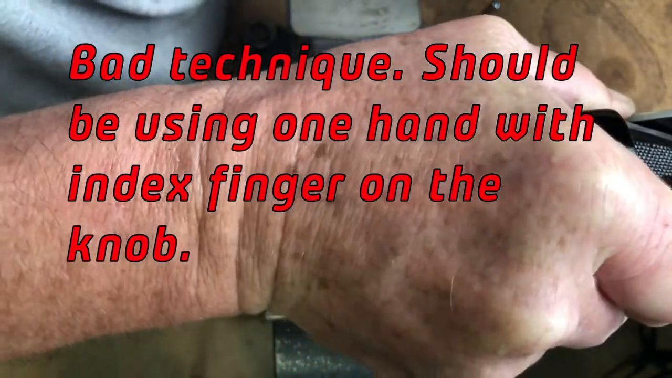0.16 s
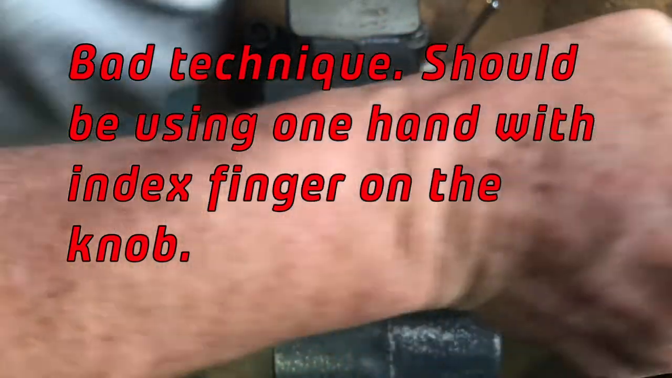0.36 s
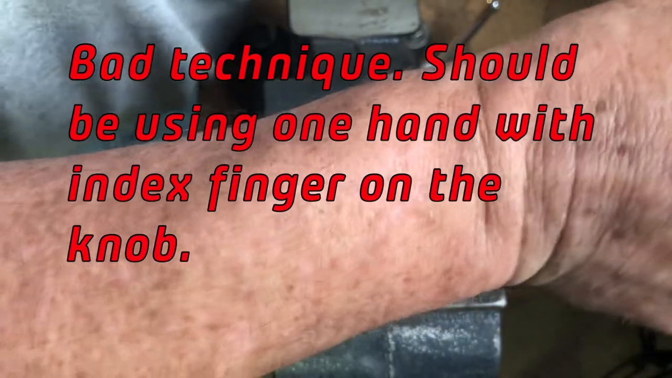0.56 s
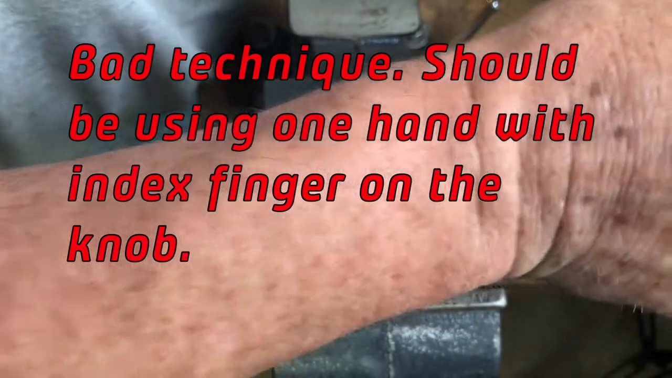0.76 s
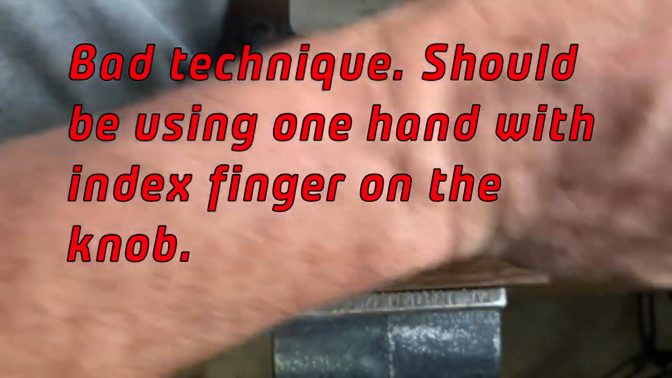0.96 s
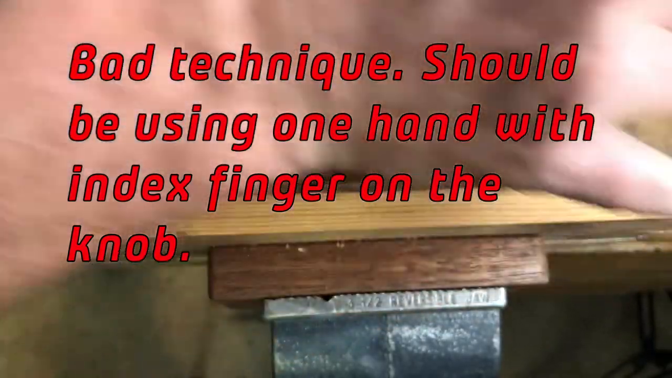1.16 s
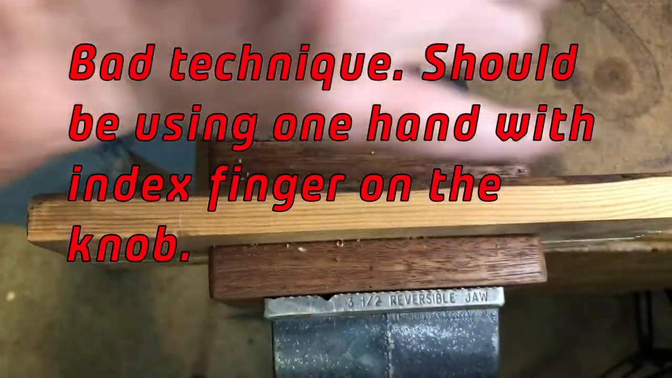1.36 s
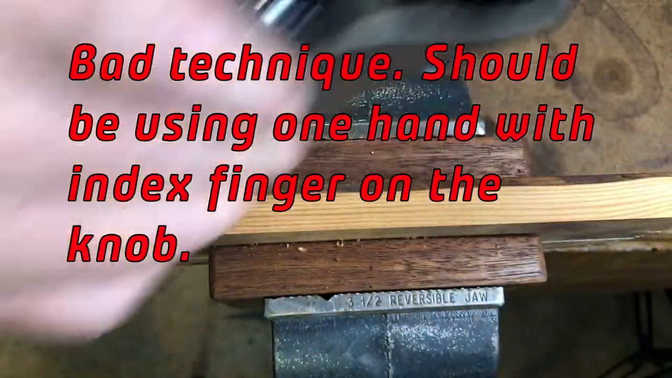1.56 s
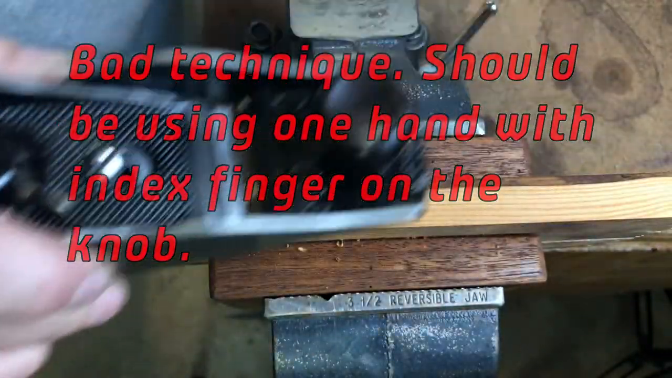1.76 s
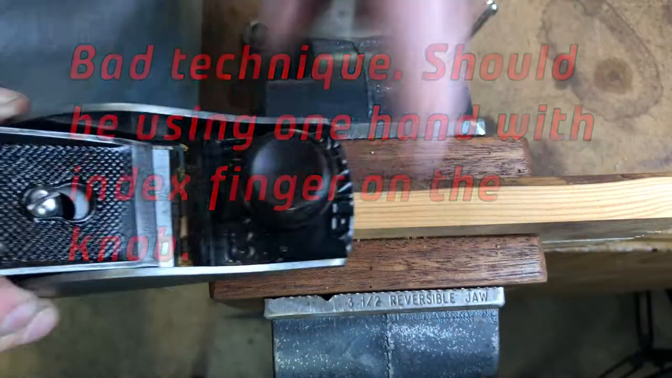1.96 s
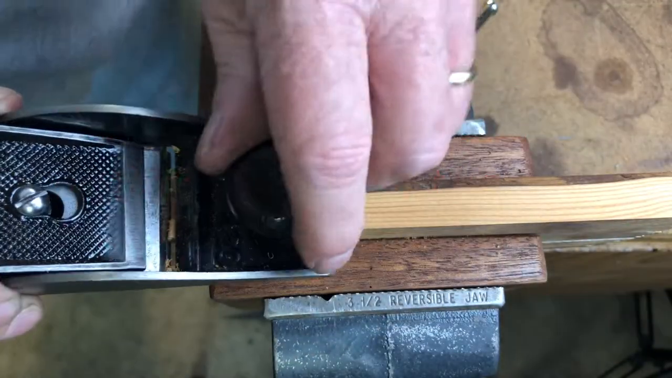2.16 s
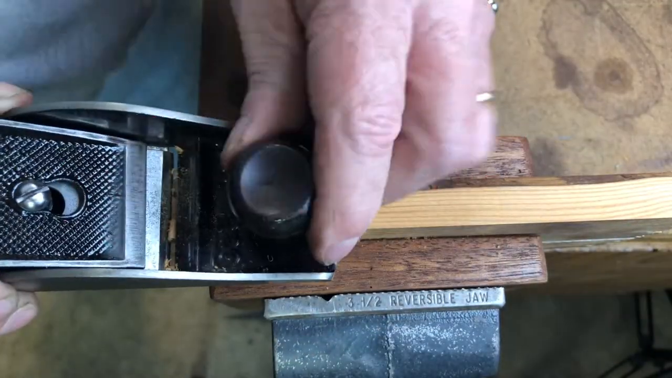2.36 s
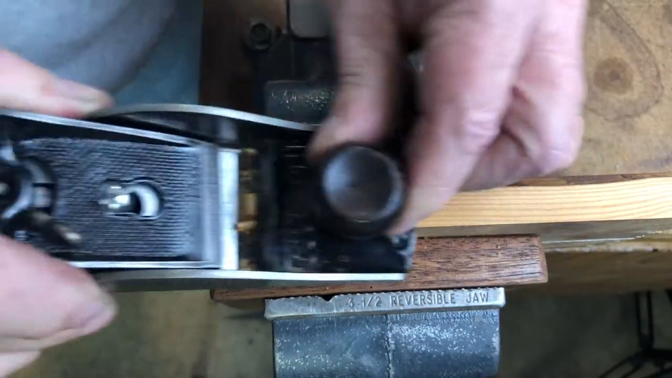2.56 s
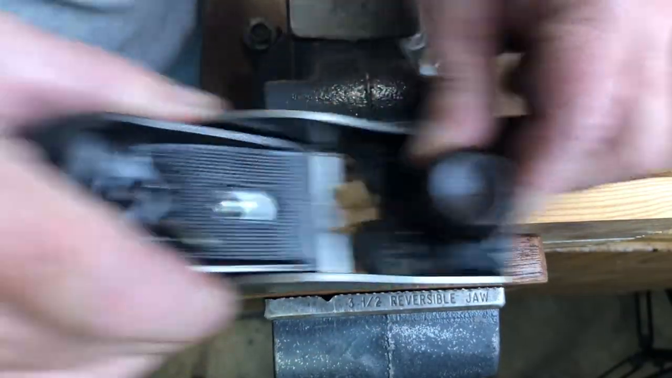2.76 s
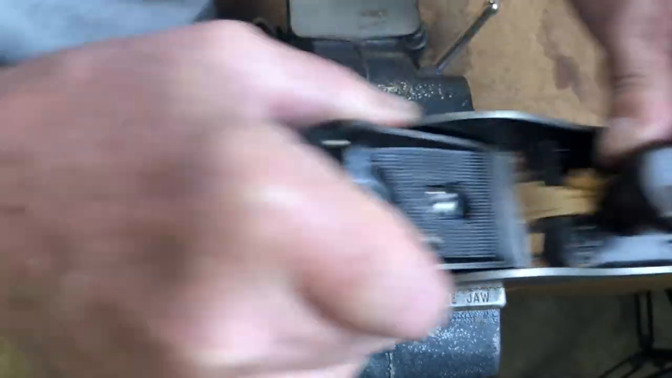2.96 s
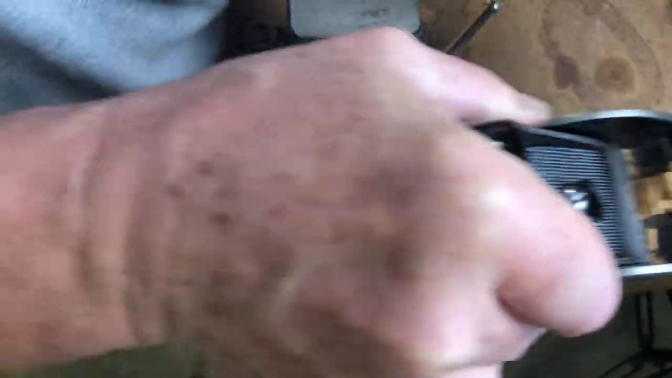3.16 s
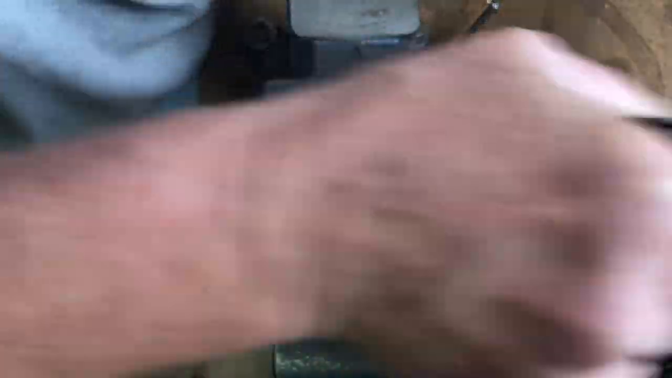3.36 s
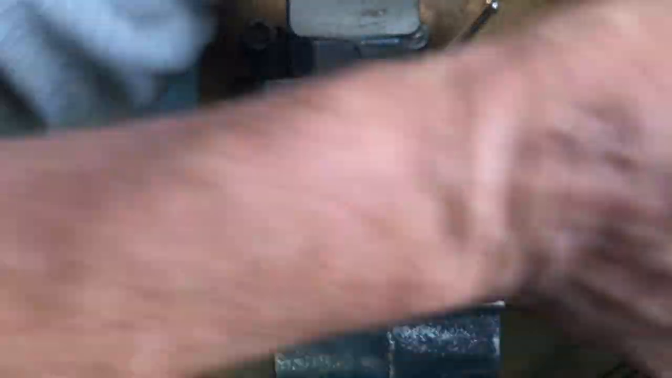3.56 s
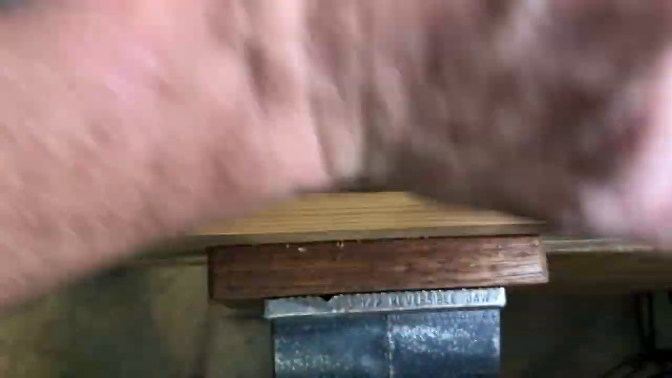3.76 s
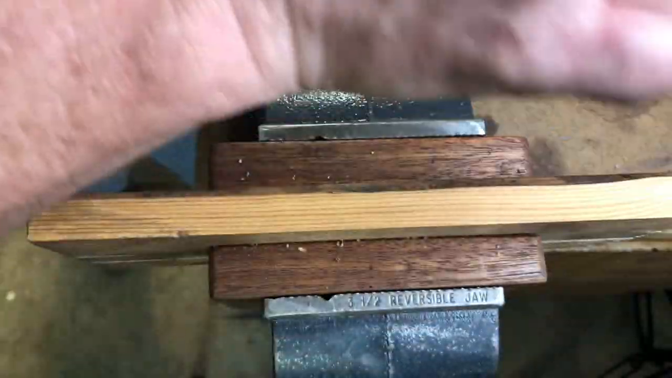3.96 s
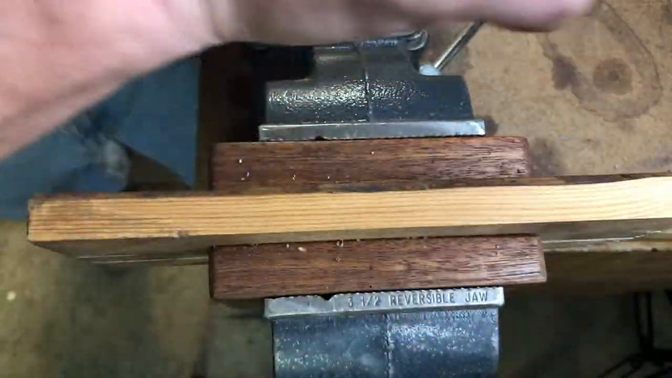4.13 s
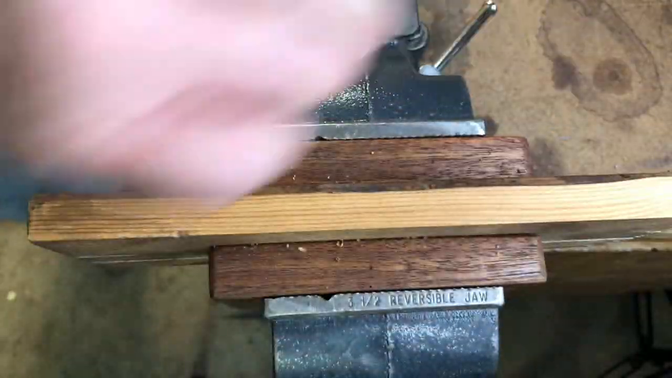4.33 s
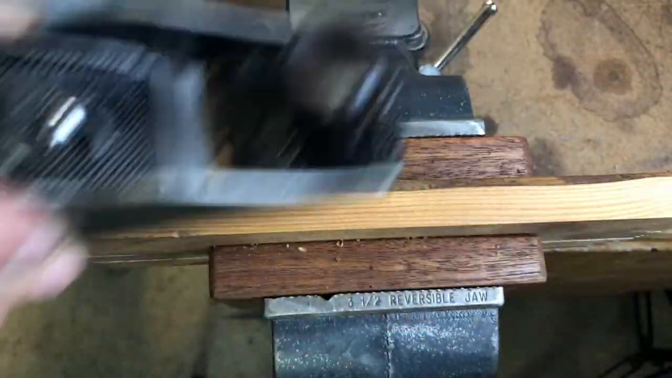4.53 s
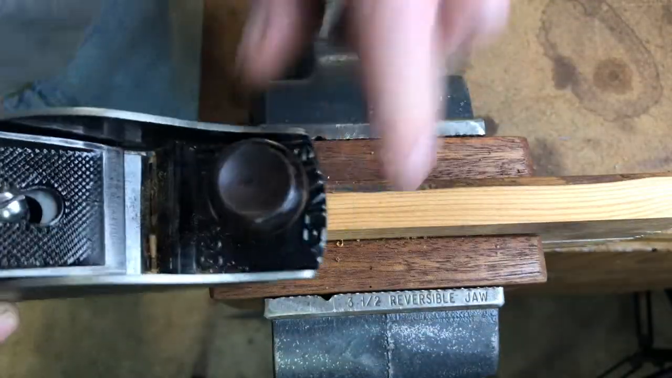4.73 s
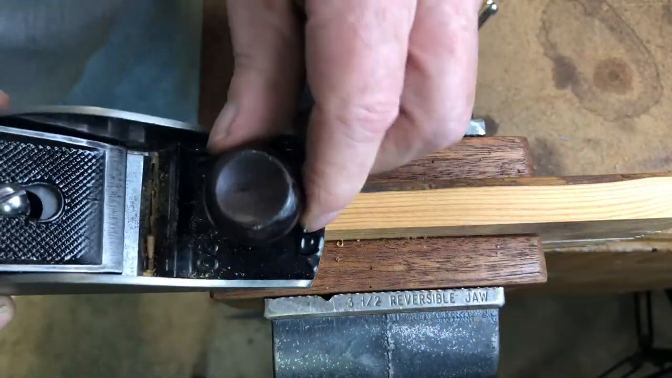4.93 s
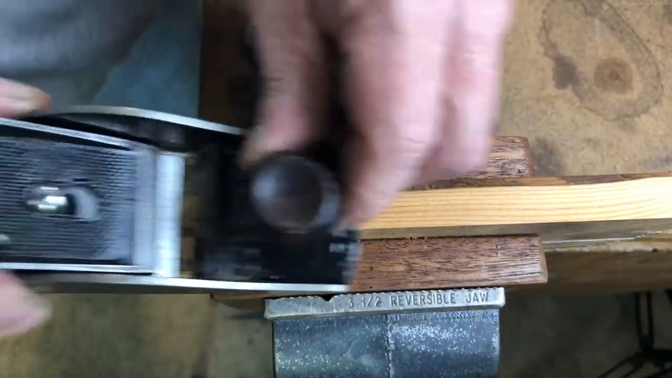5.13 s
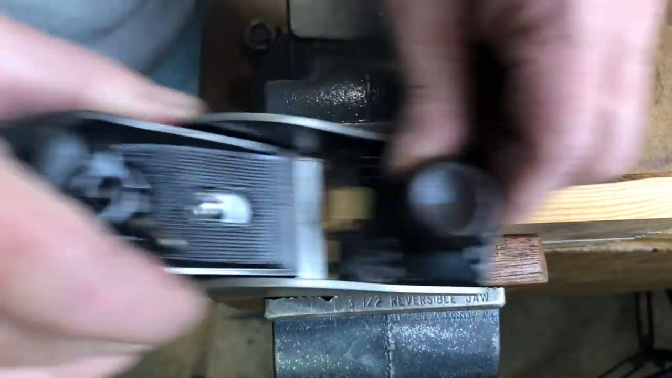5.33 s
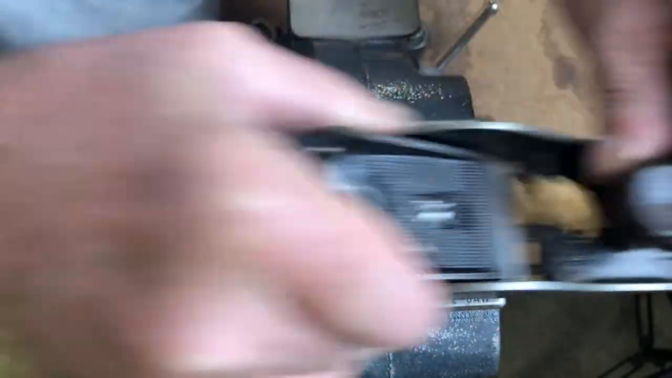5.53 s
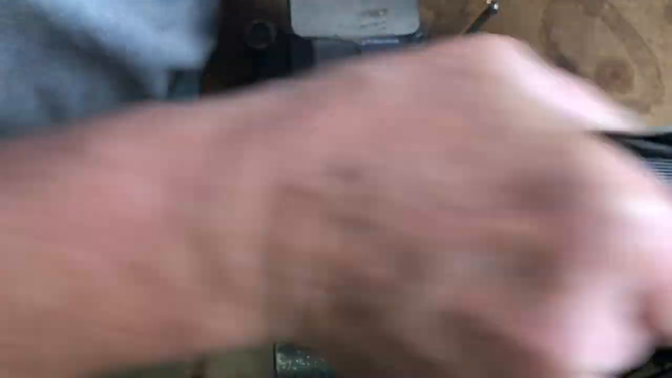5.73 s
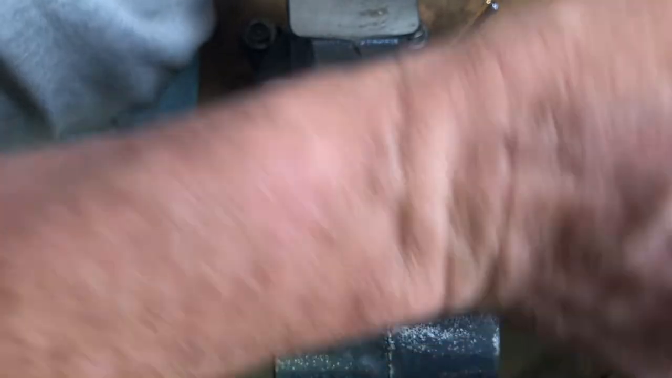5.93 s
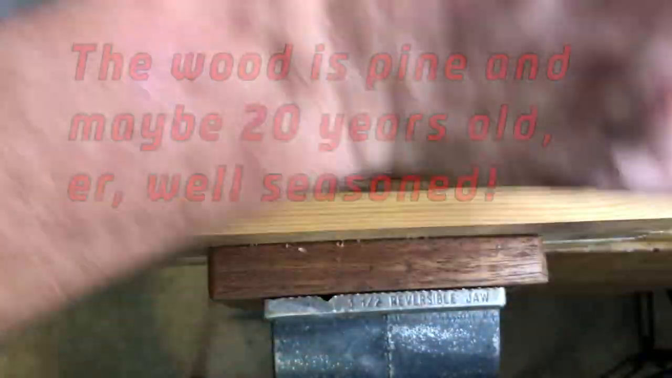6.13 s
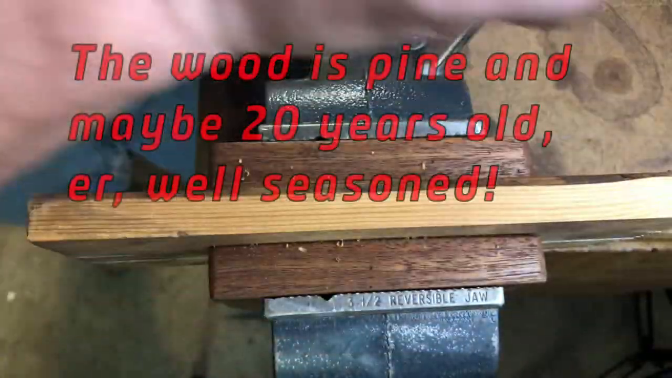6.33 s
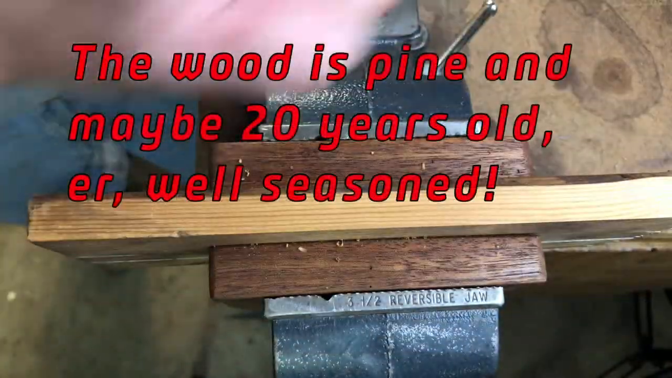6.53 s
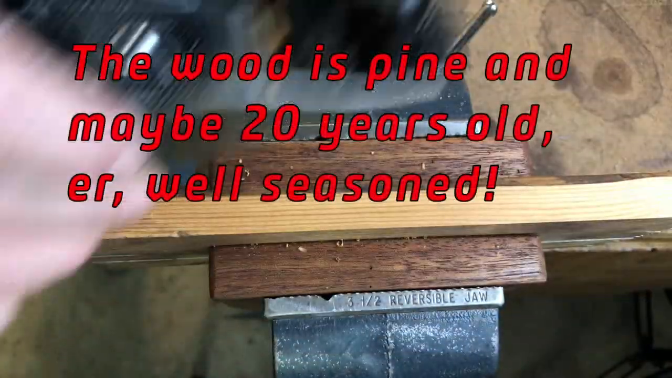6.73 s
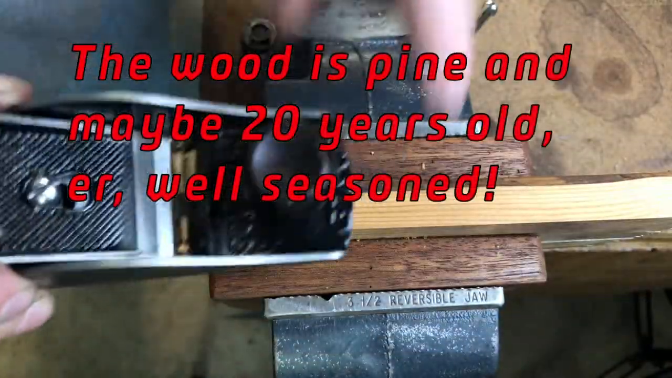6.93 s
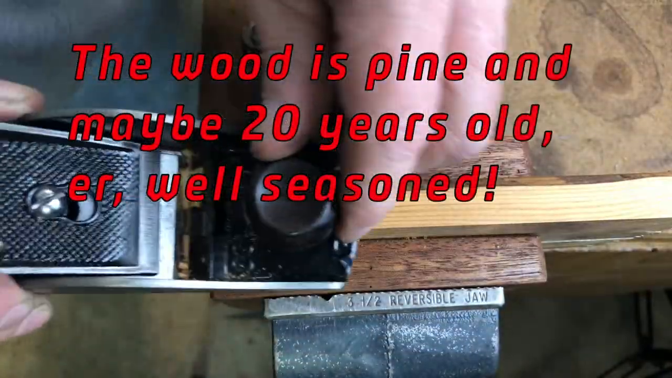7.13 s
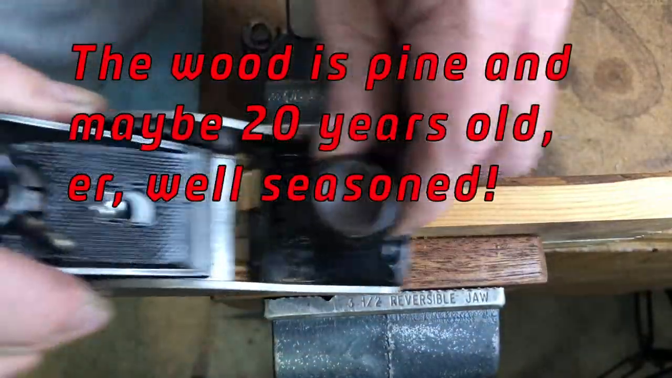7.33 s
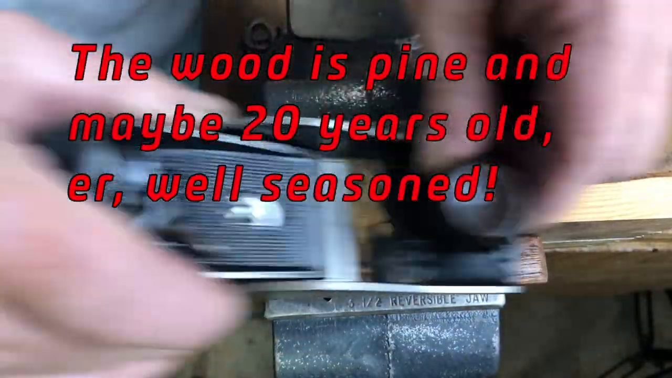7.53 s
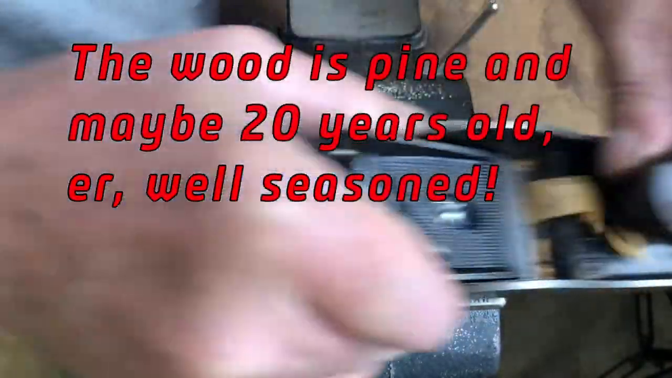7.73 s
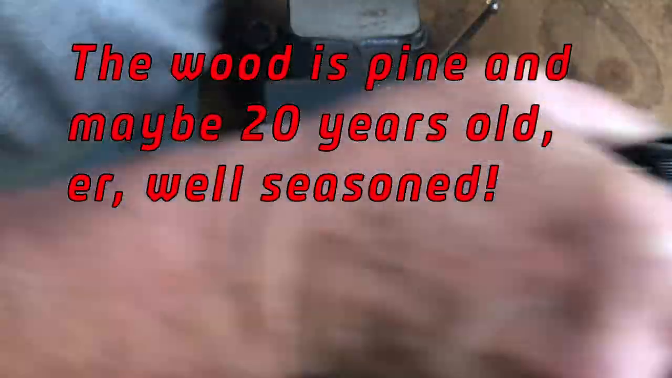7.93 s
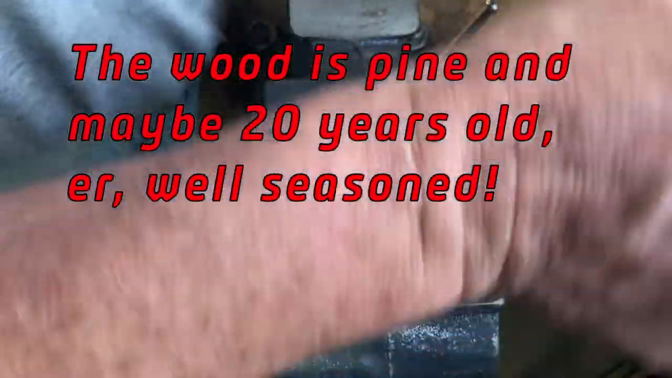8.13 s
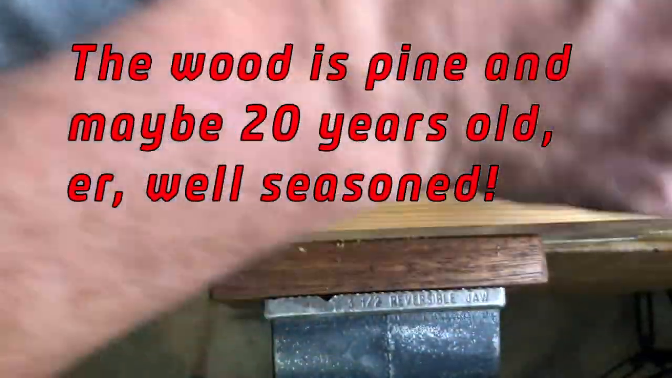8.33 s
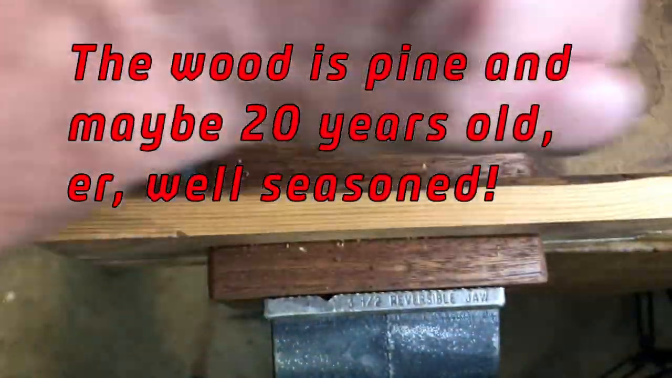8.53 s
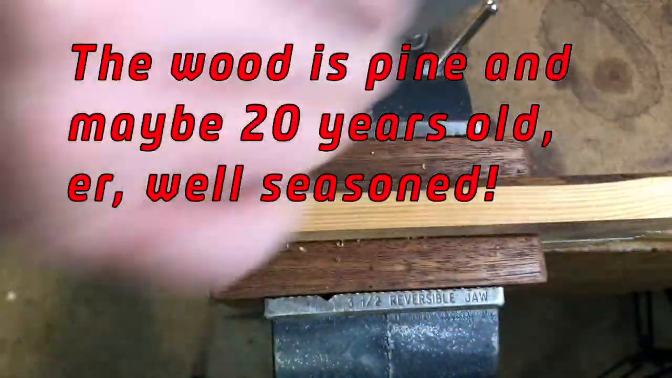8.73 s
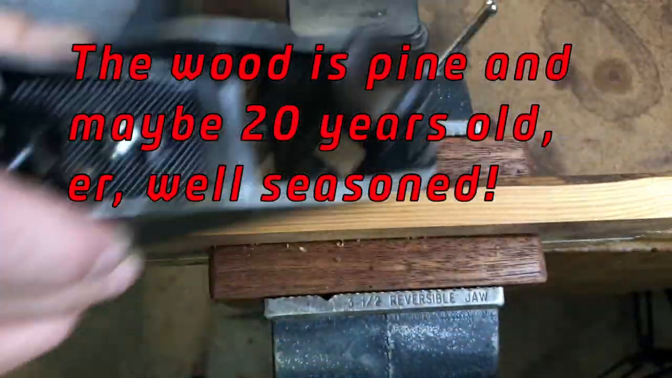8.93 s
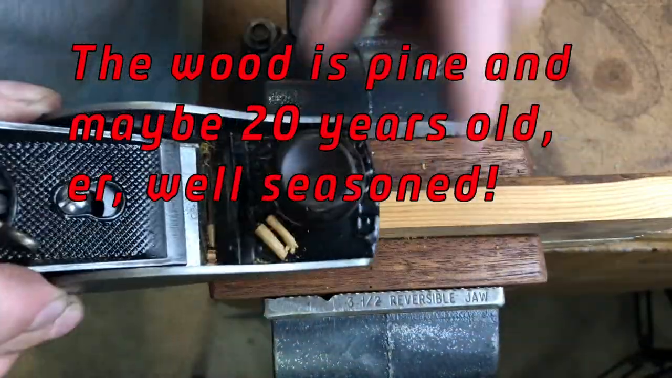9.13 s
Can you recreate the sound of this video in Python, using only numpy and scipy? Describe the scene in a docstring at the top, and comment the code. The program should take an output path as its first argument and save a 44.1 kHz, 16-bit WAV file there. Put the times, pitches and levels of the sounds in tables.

```python
"""A metal hand plane works the edge of a pine board held in a vice, heard close by in a small workshop.
First it is set down with a knock, a sum of decaying modes and filtered noise bursts, and makes short scrapes.
Then come longer strokes: friction noise from the sole, fractures that ring the iron, stick-slip chatter.
After each stroke, fingers pull the crisp shaving from the plane's mouth as a crackle of random grains.
Throughout, sleeves brush faintly over still air and a faint hum; a decaying echo follows the work."""
import sys
import numpy as np
from scipy import signal
from scipy.fft import rfft, irfft
from scipy.io import wavfile
from scipy.ndimage import uniform_filter1d, map_coordinates

SR = 44100
rng = np.random.default_rng(int(sys.argv[2]) if len(sys.argv) > 2 else 0)


def transcribe(signal):
    """Save signal, clipped to [-1, 1], as a 16-bit WAV file at the path in sys.argv[1]."""
    frames = np.atleast_2d(signal).T
    limited = np.clip(frames, -1, 1)
    pcm = np.round(limited * 32767).astype(np.int16)
    wavfile.write(sys.argv[1], SR, pcm)


N = 405279
T = np.arange(N) / SR

# Spectrum of the still air: (frequency [Hz], relative density [dB])
AIR_SPECTRUM = [(15, -43), (35, -1), (90, 1), (320, -2), (600, -9.5), (2300, -12.5), (3200, -15.5),
                (5400, -21.5), (16000, -28.5)]
# Tones of the hum: (frequency [Hz], rms level [dB])
HUM_TONES = [(118.4, -83.5), (1120, -89)]
# Echo of the workshop by octave-wide bands: (centre [Hz], decay by 60 dB [s], level [dB])
ROOM_BANDS = [(127, .5, -5), (232, .42, -9.5), (501, 0.23, -3.5), (1100, 0.26, -8.5), (1860, 0.37, -13.5),
              (4080, 0.48, -14), (8010, 0.13, -15), (14000, .16, -22.5)]

# Fingers pull a shaving out or shift on the plane: (loudest at [s], rise [s], fall [s], level [dB])
SHAVING_PULLS = [(1.18, 0.16, 0.22, -57), (1.534, 0.032, 0.047, -57), (2.26, 0.34, 0.27, -72),
                 (4.08, 0.13, 0.22, -55.5), (6.308, 0.045, 0.11, -51.5), (6.39, 0.071, 0.11, -53),
                 (6.58, 0.037, 0.052, -53.5), (8.535, 0.22, 0.17, -48.5), (8.748, 0.018, 0.066, -57)]
# Splinters snap at the edge and dry shavings crack: (time [s], level before a common cut [dB])
FIBRE_SNAPS = [(0.155, -35), (0.1768, -33.5), (0.2036, -30), (1.1784, -56), (1.514, -47), (1.64, -46.5),
               (1.785, -50.5), (2.9793, -26.5), (3.027, -29), (3.171, -35), (3.1975, -32.5), (3.254, -26),
               (4.0755, -42), (4.3141, -47.5), (4.4636, -44.5), (5.4616, -24), (6.308, -39), (6.359, -40),
               (6.5194, -49), (6.7313, -44.5), (7.708, -32), (8.533, -38), (8.6787, -54), (8.888, -44)]
# Spectra of crinkling shavings and of a snap: (frequency [Hz], relative density [dB])
SHAVING_SPECTRUM = [(300, -9), (750, -14.5), (1400, -7), (2700, -7.5), (4300, -1.5), (6000, -3),
                    (8000, -1.5), (11000, -0.5), (15500, -2)]
SNAP_SPECTRUM = [(800, -31), (2500, -14.5), (4500, -33), (8000, -1.5), (11000, -3.5), (15500, 0.5)]
# Resonances of a curled shaving: (frequency [Hz], width [Hz], gain [dB])
CURL_RESONANCES = [(2200, 250, -2), (3840, 200, 2), (4380, 240, -4.5), (5800, 660, -2.5)]

# The plane is set down, lurches or drops off the end:
# (time [s], peak level [dB], low-pass edge set by contact hardness [Hz], vice thud against the blow [dB])
PLANE_KNOCKS = [(0.021, -56, 504, 3), (0.161, -41, 390, 13), (.195, -43, 477, -16), (0.334, -36, 930, 0),
                (1.932, -37.5, 1380, -14), (3.48, -40, 687, 0.5), (4.7309, -24.5, 5400, -17.5),
                (5.027, -52, 300, 8), (5.744, -37, 595, 2), (6.9256, -29.5, 4760, -11),
                (9.044, -23, 5470, -16)]
# Light taps of the plane's loose parts: (time [s], level before a common cut [dB])
METAL_TAPS = [(.157, -40), (.2045, -39), (0.7866, -51), (0.864, -48.5), (3.336, -34.5), (6.152, -55)]
# Struck modes of plane on board and of board in vice: (frequency [Hz], level [dB], decay by 60 dB [s])
BODY_MODES = [(781, -1, 0.034), (961, 1, 0.06), (1142, -2.5, 0.069), (1530, -5, 0.039), (1710, -0.5, 0.05),
              (1893, -17, 0.032), (2250, -1, 0.018), (2563, 6, 0.016), (3960, -26, 0.02),
              (6200, -21, 0.027)]
VICE_MODES = [(81, -8, 0.46), (124, -13, 0.33), (172, -8, 0.062), (202.8, 0.5, 0.21), (329, -3.5, 0.21),
              (418.6, -10, 0.15), (487, -1.5, 0.33), (605, 4, 0.09)]
# Spectrum of the crack of a knock: (frequency [Hz], relative density [dB])
CRACK_SPECTRUM = [(100, -41), (430, -1.5), (600, -9.5), (850, -7), (1130, -2.5), (1650, -2.5), (2600, -11),
                  (3000, -18.5), (3860, -8), (4800, -24), (6150, -14.5), (8600, -20.5), (16000, -22)]

# The edge catches with a hollow rasp: (start [s], end [s], first pitch [Hz], last pitch [Hz], level [dB])
EDGE_RASPS = [(2.479, 2.523, 611, 556, -42.5), (2.652, 2.699, 484, 524, -43.5),
              (2.725, 2.783, 1500, 1880, -43.5), (2.812, 2.821, 955, 805, -48.5),
              (5.246, 5.38, 1130, 846, -42), (7.462, 7.494, 593, 782, -43), (7.52, 7.584, 1496, 1905, -40)]
# The edge sticks and slips: (full from [s], until [s], rise [s], fall [s], pitch at full [Hz],
# level [dB], irregular amplitude share [0-1])
EDGE_CHATTER = [(.548, 0.56, .04, 0.058, 496, -54, 0.5), (2.825, 3.0, 0.016, 0.24, 442.7, -43, 0.79),
                (3.11, 3.279, .22, .14, 345, -35, 0.84), (5.44, 5.64, .15, 0.29, 426.3, -50, 0.4),
                (7.641, 7.695, 0.094, 0.11, 418.6, -30.5, 0.17),
                (7.75, 7.773, 0.097, 0.033, 400.3, -37.5, 0.5)]

# The sole slides: (up to speed [s], slows [s], rise [s], fall [s], rubbing level as it slows [dB])
SOLE_SLIDES = [(0.015, 0.028, 0.034, 0.033, -61), (0.185, 0.198, 0.035, 0.05, -50.5),
               (0.233, 0.263, 0.015, 0.58, -62), (0.527, 0.541, 0.75, 0.029, -66.5),
               (0.869, .87, 0.15, 0.035, -66.5), (2.445, 2.517, 0.079, .12, -49),
               (2.648, 3.299, 0.053, 0.21, -47.5), (5.105, 5.736, 0.16, 0.058, -45),
               (7.322, 7.896, 0.31, 0.038, -46), (7.936, 8.03, 0.022, 0.062, -67)]
# The iron takes a shaving: (start [s], end [s], tearing level at end [dB], ringing level at end [dB])
IRON_CUTS = [(0.177, 0.206, -59, -45), (0.505, 0.533, -81, -55), (0.887, 0.873, -84, -63.5),
             (2.675, 3.099, -44.5, -37), (3.217, 3.307, -48, -33.5), (5.292, 5.724, -39.5, -30),
             (7.515, 7.9, -41, -34), (7.978, 8.027, -62, -56)]
# The board shudders in the vice: (full from [s], until [s], rise [s], fall [s], level [dB])
BOARD_SHUDDERS = [(0.014, 0.025, .03, 0.069, -52.5), (0.167, .2, 0.026, 0.034, -45),
                  (2.397, 2.702, 0.046, 0.2, -54), (2.548, 2.554, 0.033, .05, -46.5),
                  (3, 3.036, 0.22, 0.073, -46), (3.16, 3.342, 0.075, 0.1, -45),
                  (5.031, 5.1, 0.019, 0.18, -50.5), (7.218, 7.266, 0.17, .1, -53)]
# Resonances of board, iron and plane's mouth, each before later shaping:
# (frequency [Hz], width [Hz], gain [dB])
BOARD_RESONANCES = [(320, 30, -1), (496.7, 34, 2), (611, 62, 2.5), (945, 61, -3.5), (1084, 92, 0),
                    (1465, 140, -6), (1894, 15, 0.5), (2100, 51, -12), (2980, 31, -5)]
IRON_RESONANCES = [(1227, 58, 0.5), (1293, 62, -3), (1378, 56, 6), (1490, 50, -10.5), (2260, 46, -8.5),
                   (2512, 98, 3), (2645, 80, 0)]
MOUTH_RESONANCES = [(3590, 100, -2.5), (3980, 45, 0.5), (4270, 63, -3.5), (5050, 160, -3.5),
                    (6250, 140, 4.5), (7490, 130, -0.5), (9360, 180, -8.5), (10300, 180, -8.5)]
# Spectra of rubbing, tearing and bench rumble: (frequency [Hz], relative density [dB])
RUB_SPECTRUM = [(120, -52.5), (200, -16.5), (300, -9.5), (500, -7), (900, -9), (1740, -11), (2300, -12),
                (3000, -41.5), (8000, -31), (16000, -47)]
TEAR_SPECTRUM = [(800, -19), (1700, -5), (2200, 15.5), (2650, 15.5), (2900, 4), (3400, 3), (5000, 0.5),
                 (7500, -1.5), (8500, -1.5), (12000, -1), (15500, -2)]
RUMBLE_SPECTRUM = [(25, -46.5), (50, -11.5), (80, -8.5), (170, 4.5), (260, 0.5), (330, 0.5), (500, -10.5),
                   (1200, -56.5)]

AIR_DB = -71.5
SLEEVE_DB, SLEEVE_SWAY_DB = -89, 3.5  # sleeves brush faintly all the while
SAG_HZ_PER_S = 310  # the chatter sinks as the plane travels
RASP_EDGE_S = .06  # rise and fall of a rasp
RASP_SPREAD_HZ, SLIP_SPREAD_HZ = 194, 59.4  # scatter of the rasp and irregular slips about their pitch
LEAN_DB_PER_S = 11  # the hand leans harder as a slide goes on
# Hiss, ring of the iron and bench rumble that mere sliding makes, against the rub
SCUFF_DB, SHIVER_DB, DRAG_DB = -4.5, -7.5, -8.5
BITE_S, BREAK_S = 0.042, 0.031  # the iron sinks in; the shaving breaks off
TEAR_DB_PER_S, RING_DB_PER_S = 10.5, 41  # a growing shaving tears louder and rings the iron harder
TOP_HZ = 16200


def amp(db):
    """Logarithmic level: decibels converted to an amplitude gain."""
    return 10 ** (np.asarray(db) / 20)


def colour(x, points):
    """Minimum-phase filtering: a folded cepstrum gives the (Hz, dB) response a causal impulse."""
    hz, db = np.transpose(points)
    size = 4096
    grid = np.maximum(np.fft.rfftfreq(size, 1 / SR), 1)
    log_gain = np.log(amp(np.interp(np.log(grid), np.log(hz), db)))
    cepstrum = irfft(log_gain)
    cepstrum[1:size // 2] *= 2
    cepstrum[size // 2 + 1:] = 0
    impulse = irfft(np.exp(rfft(cepstrum)))
    return signal.fftconvolve(x, impulse)[:len(x)]


def band(x, lo, hi):
    """Band-pass filtering: only energy between two edges in Hz passes."""
    edges = [lo, min(hi, SR / 2 - 100)]
    return signal.sosfilt(signal.butter(N=3, Wn=edges, btype="band", fs=SR, output="sos"), x)


def lowpass(x, hz):
    """Second-order low-pass filtering: energy above the edge rolls off."""
    return signal.sosfilt(signal.butter(2, hz, fs=SR, output="sos"), x)


def unit(x, lo, hi):
    """Normalisation: the rms within a band is brought to 1."""
    return x / np.std(band(x, lo, hi))


def resonate(x, peaks):
    """Modal superposition: parallel resonators of (Hz, width, dB) answer one excitation."""
    out = 0
    for hz, width, db in peaks:
        out = out + amp(db) * signal.lfilter(*signal.iirpeak(hz, hz / width, fs=SR), x)
    return out


def fade(t60):
    """Exponential damping: half a second of decay, falling 60 dB in t60 seconds."""
    return amp(-60 * T[:SR // 2] / t60)


def ring(modes):
    """Free vibration: struck modes decay together, neighbours in opposite sign, with energy 1."""
    y = np.zeros(SR // 2)
    for k, (hz, db, t60) in enumerate(modes):
        y += (-1) ** k * amp(db) * fade(t60) * np.sin(2 * np.pi * hz * T[:SR // 2])
    return y / np.linalg.norm(y)


def burst(points, t60):
    """Transient noise: a damped, coloured burst with energy 1."""
    y = colour(rng.standard_normal(SR // 2) * fade(t60), points)
    return y / np.linalg.norm(y)


def walk(rate):
    """Slow random modulation: noise low-passed at a rate in Hz, with spread 1."""
    y = lowpass(rng.standard_normal(N), rate)
    return y / y.std()


def grains(rate, spread_db):
    """Random impulses: tiny fractures of uneven size and sign, so many a second on average."""
    size = amp(spread_db * np.minimum(rng.exponential(size=N), 5))
    return (rng.random(N) < rate / SR) * size * rng.choice([-1, 1], N)


def add(out, s, sound, db):
    """Superposition: mix in one blow, the rms of its loudest two milliseconds set to a level."""
    i = max(int(s * SR), 0)
    peak = np.sqrt(uniform_filter1d(sound ** 2, size=88).max())
    out[i:i + len(sound)] += (sound * amp(db) / peak)[:N - i]


def glide(hz, wobble):
    """Phase integration: a note follows a moving pitch; a complex wobble shakes its size and phase."""
    phase = 2 * np.pi * np.cumsum(hz) / SR
    return wobble.real * np.cos(phase) - wobble.imag * np.sin(phase)


def envelope(start, end, rise, fall, db_per_s=0):
    """Exponential growth and decay: 30 dB up per rise, hold or grow to the end, 30 dB down per fall."""
    out = np.zeros(N)
    i, j = np.searchsorted(T, [start - 2 * rise, end + 2 * fall])
    t = T[i:j]
    outside = np.maximum((start - t) / rise, (t - end) / fall)
    skirts_db = -30 * np.maximum(outside, 0)
    out[i:j] = amp(skirts_db + db_per_s * np.minimum(t - end, 0))
    return out


def background():
    """Stationary noise and tones: gently swelling indoor air with a hum of wandering phase."""
    swell = amp(.7 * walk(2))
    air = colour(rng.standard_normal(N) * swell, AIR_SPECTRUM)
    hum = 0
    for hz, db in HUM_TONES:
        hum = hum + np.sqrt(2) * amp(db) * np.sin(2 * np.pi * hz * T + 0.35 * walk(3))
    return amp(AIR_DB) * air / air.std() + hum


def workshop(x):
    """Reverberation: walls and bench answer with diffuse noise that decays at its own rate in each band."""
    tail = 0
    for hz, t60, db in ROOM_BANDS:
        echo = band(rng.standard_normal(SR // 2), hz / np.sqrt(2), hz * np.sqrt(2))
        echo = echo * fade(t60) * (1 - fade(0.0077))  # the echo builds up before it dies
        bandwidth_gain = np.sqrt(np.sqrt(2) * hz / SR)
        tail = tail + amp(db) * echo / np.linalg.norm(echo) * bandwidth_gain
    return x + signal.fftconvolve(x, tail)[:N]


def shavings():
    """Crackling noise: thin curls of pine crinkle between the fingers in random grains; fibres snap."""
    crinkle = colour(grains(rate=2000, spread_db=1.5) * amp(4.4 * walk(70)), SHAVING_SPECTRUM)
    crinkle = crinkle + resonate(crinkle, CURL_RESONANCES)
    pull = sum(amp(db) * envelope(s, s, rise, fall) for s, rise, fall, db in SHAVING_PULLS)
    sleeves = amp(SLEEVE_DB + SLEEVE_SWAY_DB * walk(3))
    out = (pull + sleeves) * crinkle / crinkle.std()
    for s, db in FIBRE_SNAPS:
        snap = burst(SNAP_SPECTRUM, t60=0.0081) + amp(-0.5) * burst(SHAVING_SPECTRUM, t60=0.1)
        add(out, s, snap, db - 3.0)
    return out


def blows():
    """Impact excitation: knocks ring plane and board, the vice thuds after, and light metal taps ring."""
    out = np.zeros(N)
    for s, db, hz, thud_db in PLANE_KNOCKS:
        blow = burst(CRACK_SPECTRUM, t60=0.036) + amp(-1.5) * ring(BODY_MODES)
        # a gentler contact lasts longer and so sounds duller; a harder one leaks more of a bright tick
        tick = amp(-22.0) * min(hz / 6000, 1) ** 2 * burst(SHAVING_SPECTRUM, t60=.012)
        blow = lowpass(blow, min(hz, SR / 3)) + tick
        # the heavy vice takes a moment to swing
        thud = ring(VICE_MODES) + amp(4.0) * burst(RUMBLE_SPECTRUM, t60=0.26)
        thud = thud * (1 - fade(0.038))
        add(out, s, blow / np.linalg.norm(blow) + amp(thud_db) * thud, db)
    for s, db in METAL_TAPS:
        tap = resonate(burst(SHAVING_SPECTRUM, t60=0.024), [(1513, 280, 24), (1800, 117, 1.7)])
        add(out, s, tap, db - .5)
    return out


def chatter():
    """Stick-slip oscillation: the edge rasps hollowly, or slips on the flexing board at a sinking pitch."""
    out = 0
    hoarse = walk(RASP_SPREAD_HZ) + 1j * walk(RASP_SPREAD_HZ)
    uneven = walk(SLIP_SPREAD_HZ) + 1j * walk(SLIP_SPREAD_HZ)
    for s, end, first_hz, last_hz, db in EDGE_RASPS:
        rasp = glide(np.interp(T, [s, end], [first_hz, last_hz]), hoarse)
        out = out + amp(db) * envelope(s, end, RASP_EDGE_S, RASP_EDGE_S) * rasp
    for s, end, rise, fall, hz, db, rough in EDGE_CHATTER:
        rough = np.clip(rough, 0, 1)
        # a steady tone and irregular slips share unit power
        wobble = np.sqrt(2 * (1 - rough ** 2)) + rough * uneven
        slips = glide(hz - SAG_HZ_PER_S * (T - s), wobble)
        out = out + amp(db) * envelope(s, end, rise, fall) * slips
    return out


def effort():
    """Power addition: slides, cuts and shudders set how the sole rubs, iron rings, fibres tear, bench rumbles."""
    rub = 0
    for s, end, rise, fall, db in SOLE_SLIDES:
        rub = rub + amp(db) * envelope(s, end, rise, fall, LEAN_DB_PER_S)
    bite, tear = 0, 0
    for s, end, tear_db, ring_db in IRON_CUTS:
        bite = bite + amp(ring_db) * envelope(s, end, BITE_S, BREAK_S, RING_DB_PER_S)
        tear = tear + amp(tear_db) * envelope(s, end, BITE_S, BREAK_S, TEAR_DB_PER_S)
    push = sum(amp(db) * envelope(s, end, rise, fall) for s, end, rise, fall, db in BOARD_SHUDDERS)
    # mere sliding adds its share to each
    bite = np.hypot(bite, amp(SHIVER_DB) * rub)
    tear = np.hypot(tear, amp(SCUFF_DB) * rub)
    push = np.hypot(push, amp(DRAG_DB) * rub)
    return rub, bite, tear, push


def planing():
    """Friction and fracture: random grains excite sole, board, iron and mouth as a shaving tears loose."""
    rub, bite, tear, push = effort()
    grain = amp(0.78 * walk(55))  # hard and soft wood pass under the edge
    scrape = grains(rate=7000, spread_db=2.5) * grain
    fibres = grains(rate=12000, spread_db=2.0) * grain
    board = resonate(grains(rate=5000, spread_db=4.0) * grain, BOARD_RESONANCES)
    sole = colour(scrape, RUB_SPECTRUM) + amp(-2) * board

    # each mode of the iron is plucked by its own fibres; the casting radiates two broad bands
    iron = sum(resonate(grains(rate=4000, spread_db=1.0) * grain, [mode]) for mode in IRON_RESONANCES)
    iron = resonate(iron, [(1495, 480, -0.1), (2380, 370, -8.0)])

    # the curling shaving damps now one resonance of the mouth, now another
    mouth = sum(resonate(fibres, [mode]) * amp(2.3 * walk(7.8)) for mode in MOUTH_RESONANCES)
    hiss = colour(fibres, TEAR_SPECTRUM) + amp(3.5) * mouth
    # a close reflection off the hands ripples the treble and shifts as they move
    lag_s = .0016 + .00012 * walk(2)
    reflection = map_coordinates(hiss, [(T - lag_s) * SR], order=3)
    hiss = hiss + amp(-4.5) * reflection

    bench = colour(scrape, RUMBLE_SPECTRUM)
    sole, iron = unit(sole, 650, 1100), unit(iron, 1220, 1550)
    hiss, bench = unit(hiss, 4000, 16000), unit(bench, 70, 240)
    # a deep bite also breaks off small splinters
    splinters = signal.fftconvolve(grains(rate=70, spread_db=3), burst(SNAP_SPECTRUM, t60=.004))[:N]
    iron = iron + amp(-16.0) * splinters / splinters.std()
    return rub * sole + bite * iron + tear * hiss + push * bench


def scene():
    """Linear superposition: all the work at the bench, echoed by the room, over the background."""
    work = shavings() + blows() + chatter() + planing()
    return (background() + workshop(work))[None]


def record(dry):
    """Low-pass filtering: a steep elliptic filter cuts the top of the treble."""
    return signal.sosfilt(signal.ellip(10, .2, 70, TOP_HZ, fs=SR, output="sos"), dry)


dry = scene()
out = record(dry)
transcribe(out)
```